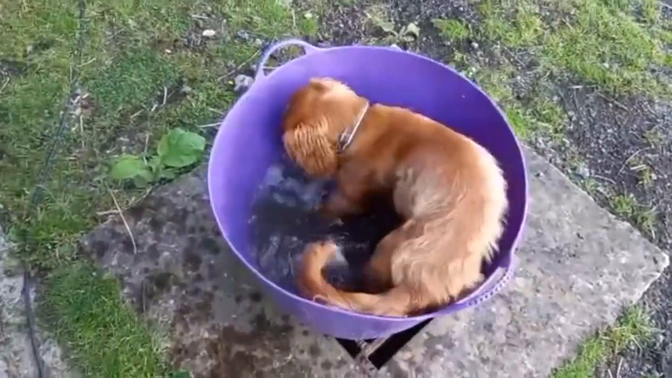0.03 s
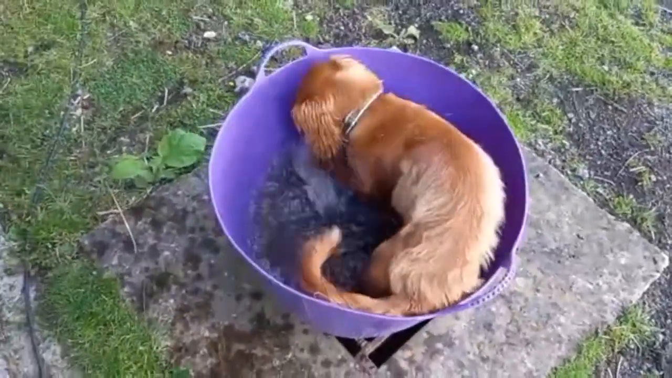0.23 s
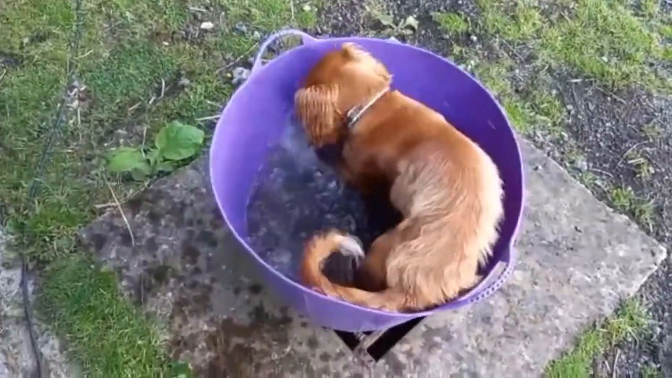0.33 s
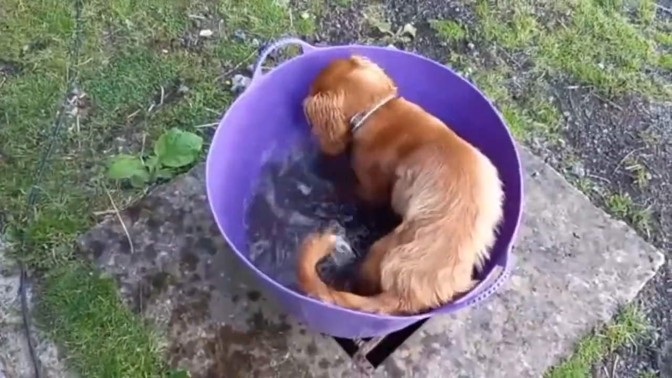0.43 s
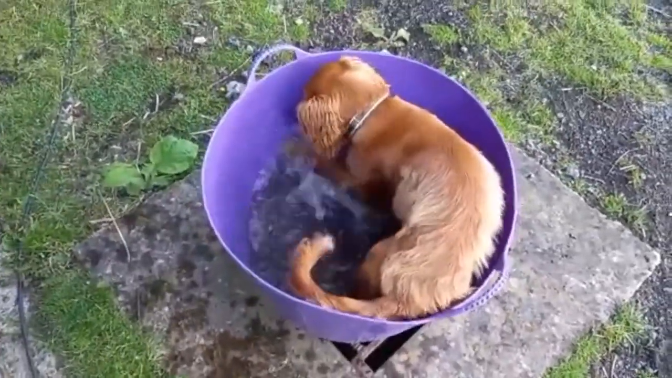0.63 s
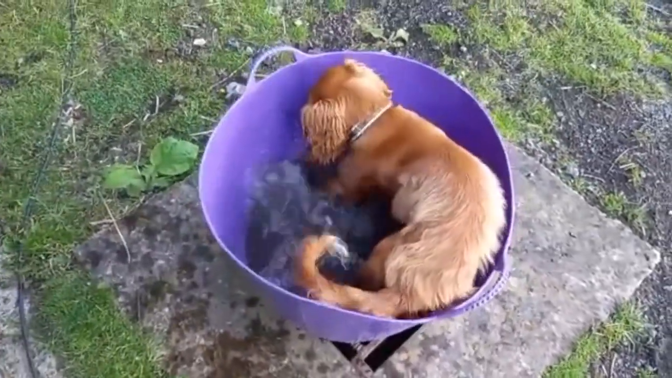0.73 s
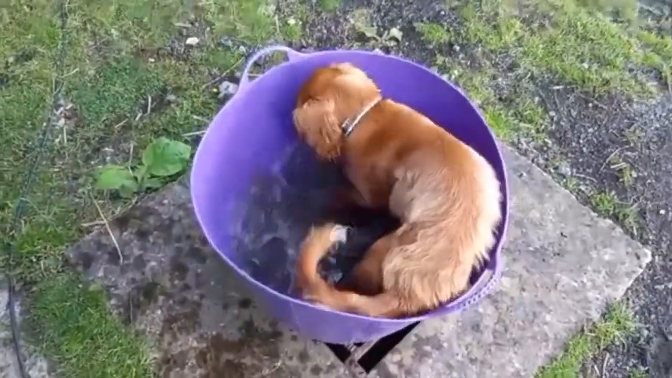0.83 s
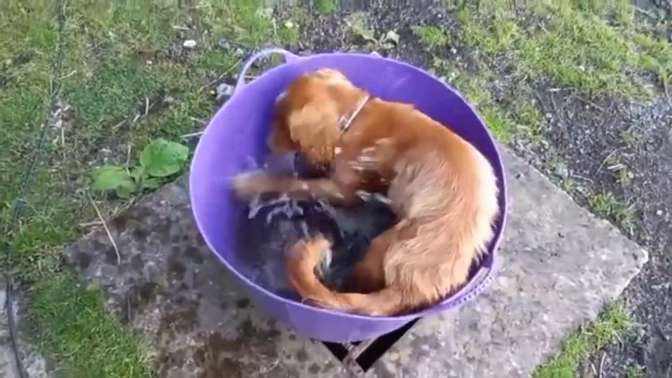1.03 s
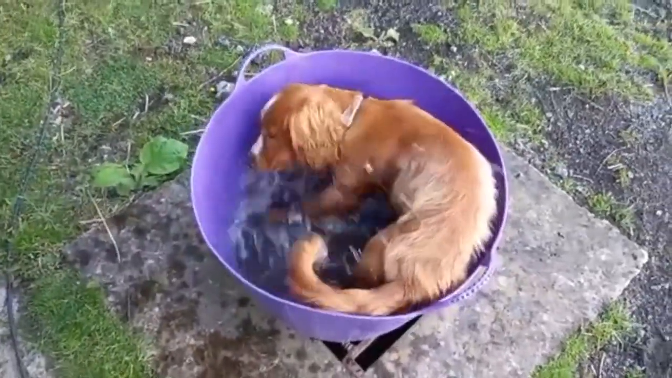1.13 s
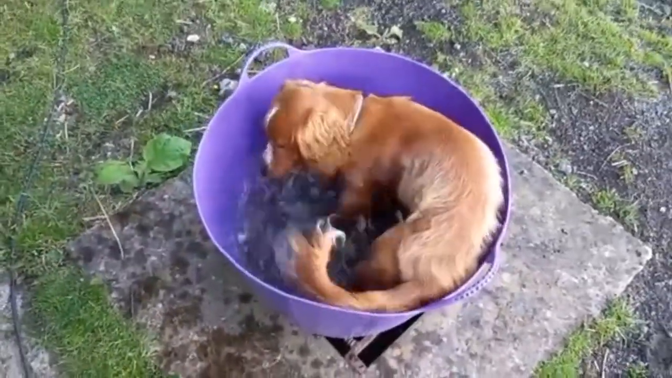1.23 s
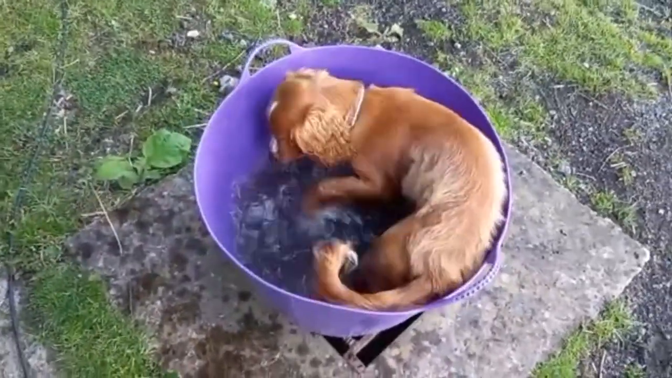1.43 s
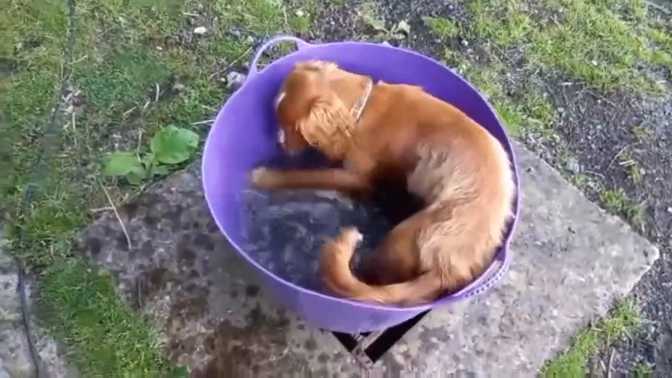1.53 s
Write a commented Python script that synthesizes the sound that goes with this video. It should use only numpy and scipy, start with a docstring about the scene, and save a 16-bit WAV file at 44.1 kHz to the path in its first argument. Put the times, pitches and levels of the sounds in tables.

```python
"""Dog sloshing in a plastic tub

A dog paws and sloshes in shallow water in a plastic tub on an outdoor stone slab, heard at two close ports.
Splashes drive random-click spray and clouds of ringing bubbles; big air pockets and paw slaps are dying sines.
Knocks ring the hollow tub's modes and it wobbles on the slab, over faint coloured noise for open air.
"""
import sys
import numpy as np
from scipy import signal
from scipy.fft import rfft, irfft
from scipy.io import wavfile

SR = 44100
rng = np.random.default_rng(int(sys.argv[2]) if len(sys.argv) > 2 else 0)


def persist_wave(psi):
    """Save psi, clipped to +-1, as 16-bit WAV."""
    counts = np.round(np.clip(psi, -1, 1) * 32767).astype(np.int16)
    wavfile.write(sys.argv[1], SR, np.atleast_2d(counts).T)


N = 70560
PARTS = 3   # parts of the tub, each with its own water sounds
BIN_HZ = np.arange(N // 2 + 1) * SR / N


def amp(db):
    """dB to gain."""
    return 10 ** (np.asarray(db) / 20)


def rms_one(x):
    """Scale to rms 1."""
    return x / np.sqrt(np.mean(x ** 2) + 1e-20)


def at_hz(points, hz):
    """Level/dB from a spectrum table, interpolated on log frequency."""
    table_hz, table_db = np.array(points).T
    return np.interp(np.log(hz + 1), np.log(table_hz), table_db)


def colour(x, points):
    """Filter by a spectrum table."""
    return irfft(rfft(x) * amp(at_hz(points, BIN_HZ)), N)


def clicks(per_s, spread_db):
    """Random clicks of uneven size and sign, one train per part; per_s is shared by all parts."""
    shape = (PARTS, N)
    size = amp(spread_db * np.minimum(rng.exponential(1, shape), 3.0))
    sign = rng.choice([-1, 1], shape)
    struck = rng.random(shape) < per_s / SR / PARTS
    return size * sign * struck


def add(out, start_s, db, hz, t60_s, onset_s, rise_per_cycle=0.):
    """Add a soft-edged dying sine, pitch climbing by a share of hz each cycle."""
    i = int(start_s * SR)
    t = np.arange(min(int(t60_s * SR) + 1, len(out) - i)) / SR
    envelope = amp(db - 60 * t / t60_s) * (1 - np.exp(-t / onset_s))
    cycles = hz * t * (1 + rise_per_cycle * hz * t / 2)
    out[i:i + len(t)] += envelope * np.sin(2 * np.pi * cycles)


# open air spectrum: f/Hz, level/dB
AIR_SPECTRUM = [(30, 5), (60, 26), (250, 2), (600, -69), (2000, 2), (8000, -75), (16000, -33)]
AIR_RMS_DB = -63.5


def open_air():
    """Coloured noise, partly shared by the two ports."""
    white = rng.standard_normal((3, N))
    return amp(AIR_RMS_DB) * rms_one(colour(white[0] + 1.2 * white[1:], AIR_SPECTRUM))


# tub rocking on the slab: t/s, level/dB, f/Hz
TUB_WOBBLES = [(.001, -36.5, 48), (.04, -43.5, 92), (.168, -48, 79), (.39, -50, 70.5), (0.466, -38, 82),
               (.52, -38, 59), (0.876, -28.5, 55.7), (1.0, -42.5, 73), (1.132, -38.5, 70.5), (1.2, -48, 80),
               (1.271, -36, 62.5), (1.361, -46.5, 70)]
WOBBLE_T60_S, WOBBLE_ONSET_S = 0.2, 0.0053


def tub_wobble():
    """The tub rocks on the slab: low dying sines, equal at both ports."""
    rock = np.zeros(N)
    for s, db, hz in TUB_WOBBLES:
        add(rock, s, db, hz, WOBBLE_T60_S, WOBBLE_ONSET_S)
    return rock


# knocks on the tub: t/s, level/dB before mode level, boom f/Hz
TUB_KNOCKS = [(.002, -28, 219), (.165, -40, 251), (.280, -30, 231), (0.372, -41, 247), (.471, -25.5, 245),
              (0.543, -42, 289), (.579, -43, 293), (0.636, -23, 235.4), (.705, -46, 260), (0.745, -49, 222),
              (.857, -14, 235.6), (.915, -34, 226), (1.014, -37, 250), (1.053, -26.5, 231),
              (1.094, -29.5, 210), (1.118, -35.5, 236), (1.181, -39, 223), (1.262, -30, 232),
              (1.291, -31, 236), (1.56, -33.5, 238)]
# tub modes: f/boom f [ratio], level/dB, t60/s
TUB_MODES = [(0.552, -19.5, 0.2), (0.998, 3, 0.089), (1.6, -8.5, 0.085)]
KNOCK_ONSET_S = 0.0027
TUB_LEFT_MINUS_RIGHT_DB = -3


def tub_knocks():
    """Paws and water knock the hollow tub; each knock rings all its modes."""
    boom = np.zeros(N)
    for s, db, hz in TUB_KNOCKS:
        for ratio, mode_db, t60_s in TUB_MODES:
            add(boom, s, db + mode_db, hz * ratio, t60_s, KNOCK_ONSET_S)
    return boom * amp([[TUB_LEFT_MINUS_RIGHT_DB / 2], [-TUB_LEFT_MINUS_RIGHT_DB / 2]])


# water running between splashes: t/s, spray level/dB, churn level/dB, gurgle level/dB
RUNNING_WATER = [(0, -47, -45.5, -51), (.05, -55.5, -55, -59.5), (.10, -64, -71.5, -71),
                 (0.162, -49.5, -56, -62.5), (.25, -50, -54, -55), (.31, -50, -49, -44.5),
                 (.37, -50, -47, -59.5), (.42, -52.5, -67, -54.5), (.52, -47, -50, -42),
                 (.60, -50.5, -45.5, -50.5), (.70, -54.5, -46, -41), (.80, -48, -44.5, -48),
                 (0.899, -40, -44, -50.5), (0.954, -56, -46.5, -43), (1.06, -45.5, -40.5, -46),
                 (1.12, -47, -56, -44.5), (1.16, -46.5, -48, -70), (1.24, -45, -55, -56),
                 (1.289, -50, -46, -41), (1.33, -54.5, -44, -54.5), (1.38, -49, -48, -62),
                 (1.414, -52.5, -55, -65.5), (1.459, -50, -42.5, -70.5), (1.52, -50.5, -56.5, -57.5),
                 (1.6, -44, -41.5, -45)]
# splashes: peak t/s, rise/s, fall t60/s, spray level/dB, churn level/dB
SPLASH_EVENTS = [(.004, 0.0047, 0.083, -53.5, -34), (.062, .002, 0.025, -48.5, -48),
                 (0.223, 0.03, 0.077, -45, -33.5), (0.246, 0.013, 0.24, -64, -33),
                 (0.273, 0.015, 0.55, -65, -38), (0.351, 0.012, 0.088, -50, -39),
                 (0.365, .005, 0.11, -49, -45.5), (0.432, .005, .05, -45, -49),
                 (0.46, 0.028, 0.078, -31.5, -32), (.472, 0.024, 0.16, -30, -30.5),
                 (.565, 0.033, 0.04, -35, -37), (0.613, .006, .15, -41, -42),
                 (0.628, 0.0038, 0.14, -44, -25), (0.642, 0.027, 0.07, -32.5, -33.5),
                 (0.657, .006, 0.17, -34.5, -31.5), (0.694, 0.0033, 0.026, -38.5, -30),
                 (0.71, 0.0052, 0.11, -39.5, -41), (.767, 0.022, 0.047, -48, -35),
                 (0.791, 0.0022, 0.035, -30.5, -32), (0.827, 0.045, 0.12, -40.5, -37.5),
                 (0.853, 0.0059, 0.05, -16, -23.5), (0.974, 0.001, 0.017, -23, -29),
                 (0.988, 0.011, 0.073, -29, -38.5), (1.015, 0.0052, 0.054, -27.5, -36),
                 (1.045, 0.0027, 0.057, -38, -31.5), (1.092, 0.011, 0.084, -21.5, -43),
                 (1.101, 0.0081, 0.076, -29, -28), (1.123, 0.017, 0.22, -41, -40.5),
                 (1.180, 0.005, 0.074, -47, -37.5), (1.218, 0.022, 0.15, -39, -39.5),
                 (1.258, 0.02, 0.17, -31.5, -34), (1.283, 0.027, 0.088, -46, -27.5),
                 (1.304, 0.0023, 0.01, -33.5, -50), (1.347, 0.0099, 0.091, -40, -44),
                 (1.393, .02, 0.02, -40.5, -64), (1.432, 0.0014, 0.037, -35, -55),
                 (1.483, .003, 0.07, -43, -66), (1.528, 0.0067, 0.044, -38, -52),
                 (1.551, 0.02, 0.16, -37, -35)]
RISE_DB = 28   # climbed over the rise time


def vigour():
    """Gains of spray, churn and gurgle: running-water power plus splash power (spray, churn only)."""
    t = np.arange(N) / SR
    s, *levels = np.transpose(RUNNING_WATER)
    power = amp(2 * np.array([np.interp(t, s, db) for db in levels]))
    for peak_s, rise_s, fall_s, *db in SPLASH_EVENTS:
        rising_db = RISE_DB * (t - peak_s) / rise_s
        falling_db = -60 * (t - peak_s) / fall_s
        shape_db = np.maximum(np.where(t < peak_s, rising_db, falling_db), -99)
        power[:2] += amp(2 * (shape_db + np.array(db)[:, None]))
    return np.sqrt(power)


# spray spectrum: f/Hz, level/dB
SPRAY_SPECTRUM = [(600, -13), (1500, -3.5), (3500, -1.5), (6000, -5), (8500, -1.5), (11000, -6.5),
                  (14000, -6), (15000, -9), (16000, -0.5)]
DROPS_PER_S, DROP_SPREAD_DB = 9000, 4
SPURT_CUTOFF_HZ, SPURT_RMS_DB = 70, 2.5


def spray(gain):
    """Dense droplets ticking on water and plastic, in uneven spurts: low-passed noise sways the level."""
    slow = signal.butter(2, SPURT_CUTOFF_HZ, fs=SR, output="sos")
    spurts = rms_one(signal.sosfilt(slow, rng.standard_normal(N)))
    drops = colour(clicks(DROPS_PER_S, DROP_SPREAD_DB), SPRAY_SPECTRUM)
    return gain * rms_one(amp(SPURT_RMS_DB * spurts) * drops)


BUBBLE_RISE_PER_CYCLE = 0.011


def bubbles(gain, strength, per_s, spread_db, t60_cycles, count):
    """Bubble cloud: clicks dealt among count pitches, each ringing t60_cycles and rising in pitch."""
    born = gain * rms_one(clicks(per_s, spread_db))
    pitches = np.geomspace(strength[0][0], strength[-1][0], count)
    dealt = rng.integers(0, count, born.shape)
    out = np.zeros((PARTS, N))
    for k, hz in enumerate(pitches):
        t60_s = t60_cycles / hz
        ring = np.zeros(int(t60_s * SR) + 2)
        add(ring, 0, 0, hz, t60_s, .5 / hz, BUBBLE_RISE_PER_CYCLE)
        ring *= amp(at_hz(strength, hz)) / np.linalg.norm(ring)   # unit energy, then strength
        out += signal.oaconvolve(born * (dealt == k), ring[None])[:, :N]
    return out


# ringing droplets: f/Hz, level/dB relative to spray gain
DRIP_STRENGTH = [(3000, -11.5), (5500, -11.5), (8500, -10), (13000, -18)]


def drips(gain):
    """High droplets with long rings, following the spray."""
    return bubbles(gain, DRIP_STRENGTH, per_s=1400, spread_db=5, t60_cycles=61, count=16)


# churned bubbles: f/Hz, level/dB
CHURN_STRENGTH = [(600, -9.5), (900, -6), (1500, -3), (2500, -3.5), (3500, -2.5), (5000, -19)]


def churn(gain):
    """Bubble cloud churned up by splashes and running water."""
    return bubbles(gain, CHURN_STRENGTH, per_s=1300, spread_db=0.5, t60_cycles=14.9, count=24)


# deep bubbles: f/Hz, level/dB
GURGLE_STRENGTH = [(200, -7.5), (300, -2.5), (400, -0.5), (550, -5.5), (700, -7.5)]


def gurgle(gain):
    """Sparser deep bubbles in the running water."""
    return bubbles(gain, GURGLE_STRENGTH, per_s=300, spread_db=2, t60_cycles=16, count=12)


# single air pockets: t/s, level/dB, f/Hz, t60/s, pitch rise per cycle [share]
AIR_POCKETS = [(.175, -35, 1730, 0.023, -0.0005), (.216, -23.5, 930, 0.024, 0.027),
               (.222, -37, 3230, 0.011, -0.0052), (.223, -23, 1980, 0.017, 0.00016),
               (0.236, -22, 1100, 0.01, 0.0079), (.242, -21, 3000, 0.014, .003),
               (0.245, -20, 1600, 0.025, 0.0011), (.249, -24, 687, 0.035, -0.031),
               (.270, -17.5, 501, 0.026, -0.013), (0.277, -15.5, 1000, 0.016, -0.011),
               (.290, -14.5, 604, 0.041, 0.005), (.307, -15.5, 584, .025, .004),
               (.451, -22, 514, 0.032, 0.016), (0.466, -7, 449, 0.027, -0.011),
               (.486, -18.5, 400, 0.057, 0.0054), (0.562, -21.5, 2430, 0.019, 0.0013),
               (0.626, -12, 1750, .015, .003), (.632, -11.5, 470, 0.028, 0.0054),
               (.640, -20, 1930, .02, 0.018), (.643, -17, 2670, .015, -0.005),
               (.658, -16, 754, 0.027, -0.0047), (0.664, -20, 1620, 0.018, 0.016),
               (0.694, -28, 3100, .012, 0.018), (0.71, -19.5, 870, 0.016, -0.02),
               (.715, -19.5, 447, 0.046, 0.017), (.815, -32, 406, 0.12, 0.0036),
               (0.817, -14, 2400, 0.017, -0.012), (.852, -6.5, 1323, 0.018, -0.0012),
               (0.85, -9, 1620, 0.017, 0.036), (.853, -8, 3440, 0.019, 0.051),
               (.854, -8, 4410, 0.014, -0.021), (.885, -30, 383, 0.16, 0.00099),
               (.935, -25, 390, 0.046, 0.0039), (0.972, -19.5, 1710, 0.016, -0.0035),
               (.988, -22, 2235, 0.024, 0.015), (1.017, -28, 3120, 0.013, 0.021),
               (1.034, -24, 2410, 0.015, .003), (1.048, -16.5, 968, 0.016, .003),
               (1.073, -14.5, 1790, 0.021, 0.0044), (1.090, -13, 2350, 0.016, 0.0077),
               (1.097, -28, 3400, 0.011, .002), (1.098, -27, 1210, 0.01, 0.0082),
               (1.104, -14, 532, 0.027, -0.012), (1.180, -21.5, 1935, 0.016, -0.0044),
               (1.221, -17, 1720, .025, .002), (1.246, -27, 1580, 0.027, .002),
               (1.253, -19.5, 3040, .015, 0.0065), (1.262, -15, 506, 0.031, 0.00014),
               (1.263, -19.5, 1024, 0.023, -0.0074), (1.279, -25, 1130, 0.034, 0.018),
               (1.306, -15.5, 2470, 0.014, 0.015), (1.350, -23.5, 1170, 0.032, 0.0032),
               (1.433, -23.5, 1774, 0.025, .003), (1.436, -32, 871, 0.048, 0.0048),
               (1.483, -21.5, 3000, 0.017, 0.0024), (1.515, -35, 1030, 0.028, 0.0022),
               (1.549, -23, 1853, 0.026, 0.011)]
PLOP_ONSET_S = 0.0021


def plops():
    """Big air pockets ring and glide up or down, dealt to the parts in turn."""
    out = np.zeros((PARTS, N))
    for k, (s, db, hz, t60_s, rise) in enumerate(AIR_POCKETS):
        add(out[k % PARTS], s, db, hz, t60_s, PLOP_ONSET_S, rise)
    return out


# flat paw slaps on the water: t/s, level/dB, f/Hz
PAW_SLAPS = [(.112, -36, 3250), (.194, -27, 2570), (.238, -13.5, 1480), (0.2805, -29, 1150),
             (.467, -22.5, 1090), (0.6276, -15, 2210), (0.6321, -9.5, 1400), (.641, -23, 900),
             (0.695, -16.5, 3260), (0.71, -19, 970), (0.792, -16, 3800), (0.8521, -6, 1270),
             (0.975, -15, 1630), (1.0479, -17, 1000), (1.053, -19, 900), (1.100, -13.5, 1120),
             (1.307, -21, 2570), (1.484, -28, 3200), (1.563, -27.5, 1200)]
SLAP_T60_S, SLAP_ONSET_S = 0.0054, 0.00028


def slaps():
    """A paw slaps the water flat: a very short ring, in the middle part."""
    out = np.zeros((PARTS, N))
    for s, db, hz in PAW_SLAPS:
        add(out[1], s, db, hz, SLAP_T60_S, SLAP_ONSET_S)
    return out


# right port delay per part: lag/s
RIGHT_LAGS_S = [.00005, .00009, 0.00014]
# left minus right per part, before SIDE_DB: level/dB
PART_BALANCE_DB = [-1.5, -0.5, -2]
SIDE_DB = 1.15   # left up, right down by this
# echoes off tub wall and slab: delay/s before stretch, level/dB
NEAR_ECHOES = [(.0009, -14), (.0017, -15.5), (.0029, -13.5), (.0047, -14.5), (.008, -15.5)]
# echo delay factor [ratio]: rows left, right; columns parts
ECHO_DELAY_RATIO = [
    [0.861, 1.04, 1.15],
    [1.09, .93, 0.76],
]


def ports(parts):
    """Each part reaches the right port late; near echoes differ by part and side."""
    spectra = rfft(parts)
    pan = amp(SIDE_DB + np.array(PART_BALANCE_DB)[:, None] / 2)
    late = np.exp(-2j * np.pi * BIN_HZ * np.array(RIGHT_LAGS_S)[:, None])
    direct = np.array([spectra * pan, spectra * late / pan])
    ratio = np.array(ECHO_DELAY_RATIO)[..., None]
    echoes = 1 + sum(amp(db) * np.exp(-2j * np.pi * BIN_HZ * s * ratio) for s, db in NEAR_ECHOES)
    return irfft((direct * echoes).sum(axis=1), N)


def scene():
    """Water and tub at the two ports, over open air."""
    fine, coarse, deep = vigour()
    water = spray(fine) + drips(fine) + churn(coarse) + gurgle(deep) + plops() + slaps()
    return open_air() + tub_wobble() + tub_knocks() + ports(water)


LOW_CUT_HZ, HIGH_CUT_HZ = 37, 16150


def record(dry):
    """Cut deep bass and, steeply, the top."""
    low_cut = signal.butter(4, LOW_CUT_HZ, "high", fs=SR, output="sos")
    high_cut = signal.cheby2(14, 60, HIGH_CUT_HZ, fs=SR, output="sos")
    return signal.sosfilt(high_cut, signal.sosfilt(low_cut, dry))


dry = scene()
out = record(dry)
persist_wave(out)
```